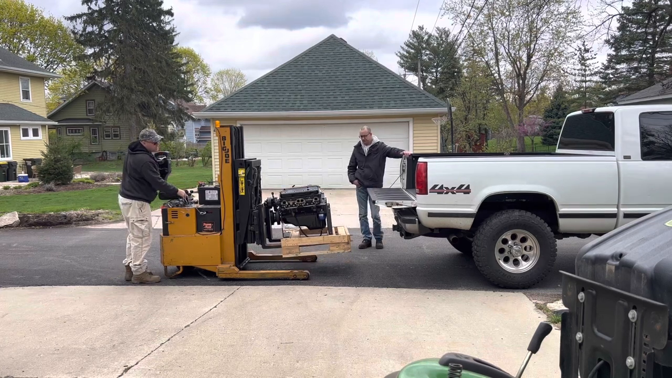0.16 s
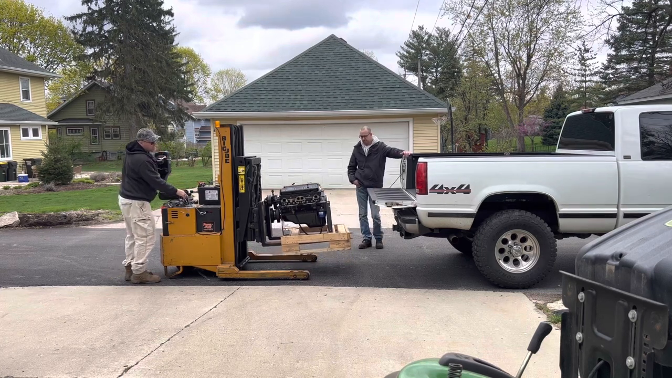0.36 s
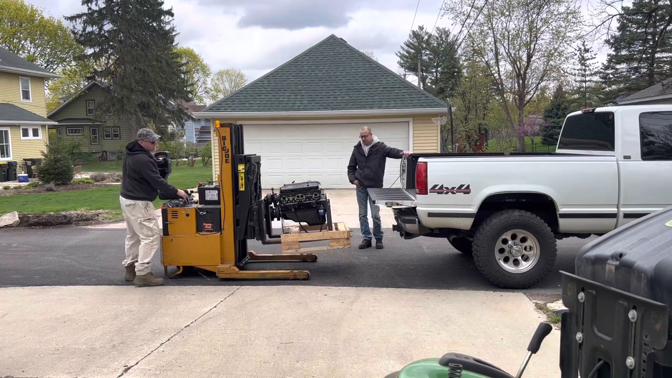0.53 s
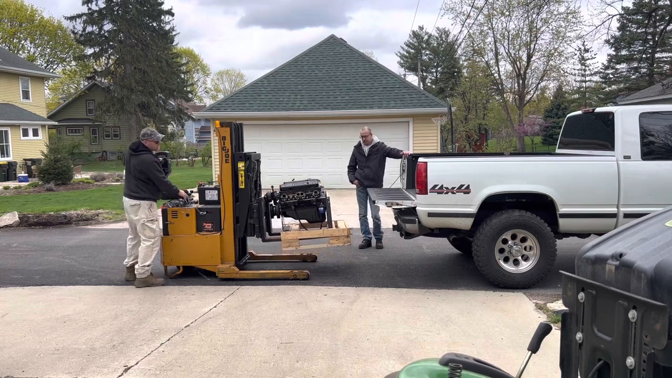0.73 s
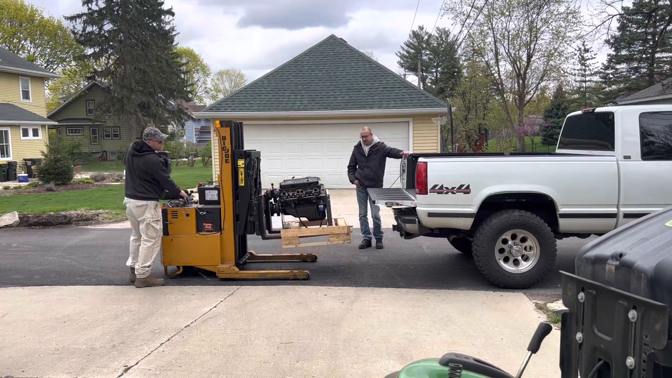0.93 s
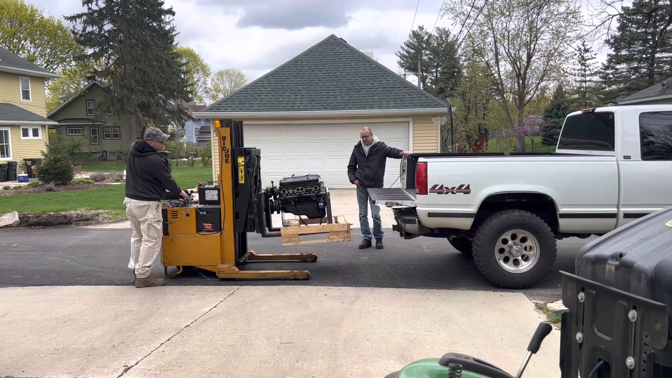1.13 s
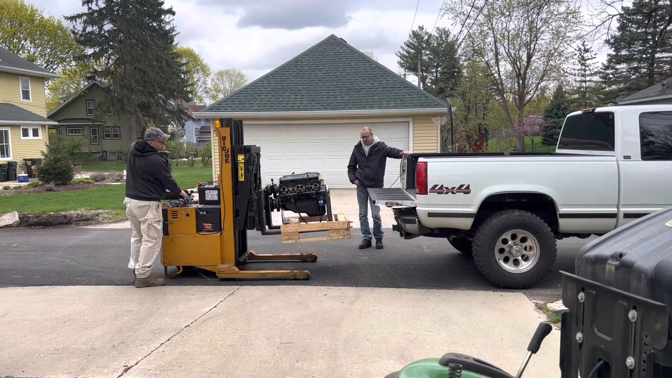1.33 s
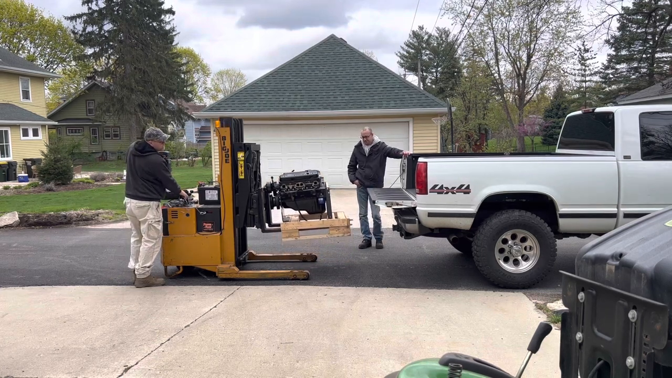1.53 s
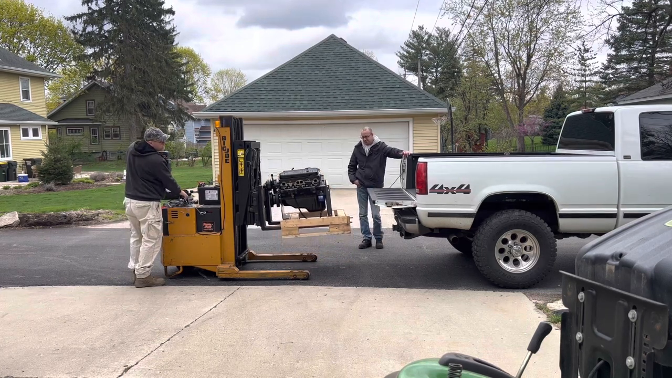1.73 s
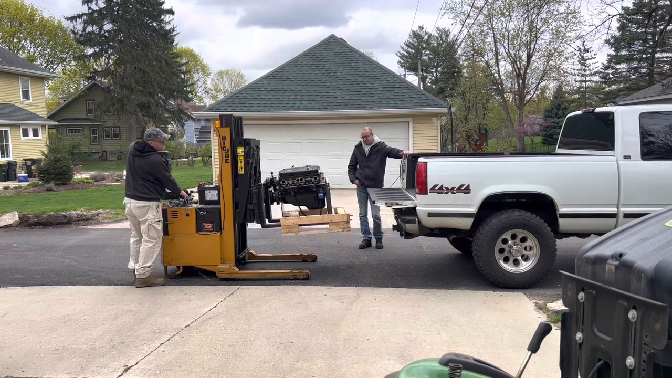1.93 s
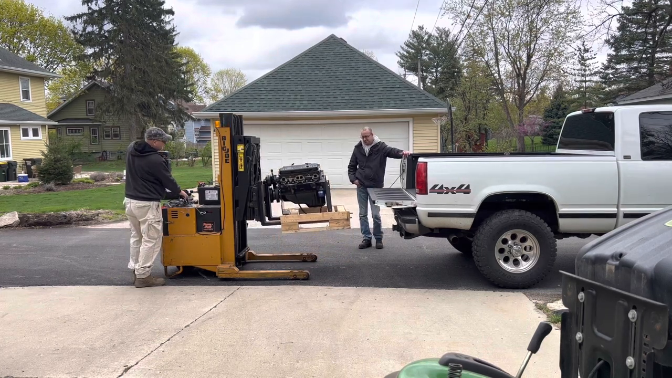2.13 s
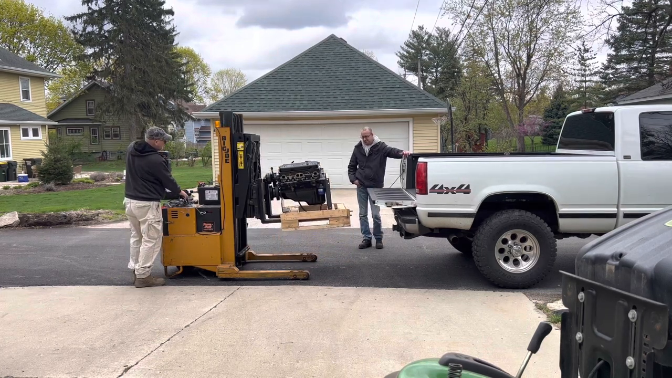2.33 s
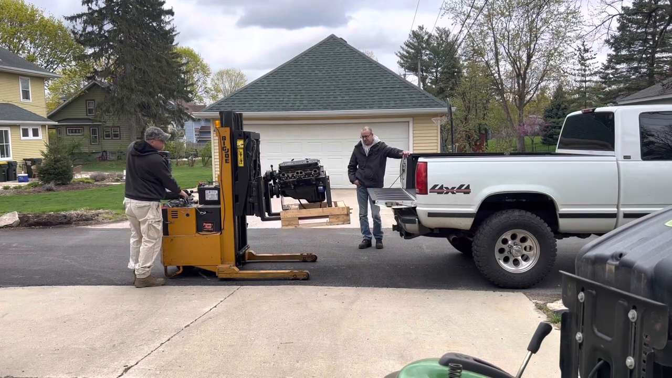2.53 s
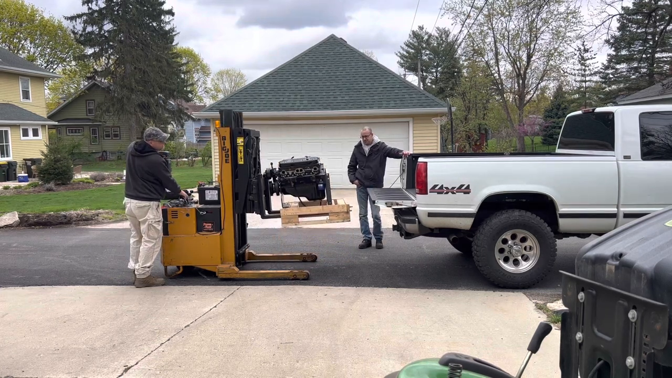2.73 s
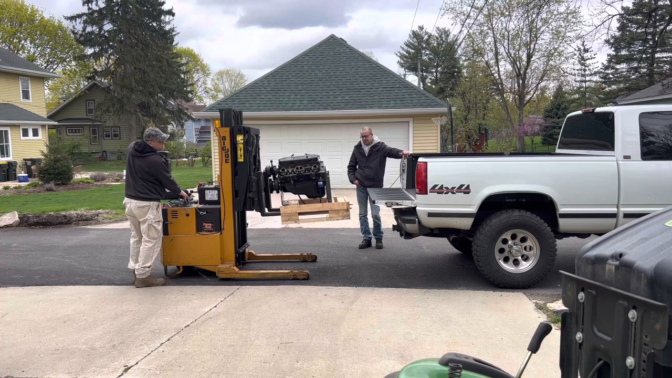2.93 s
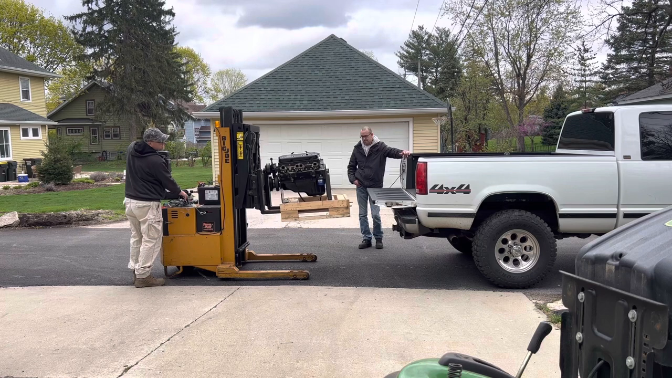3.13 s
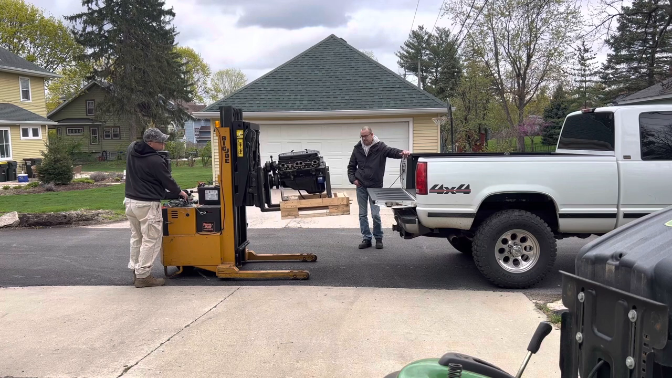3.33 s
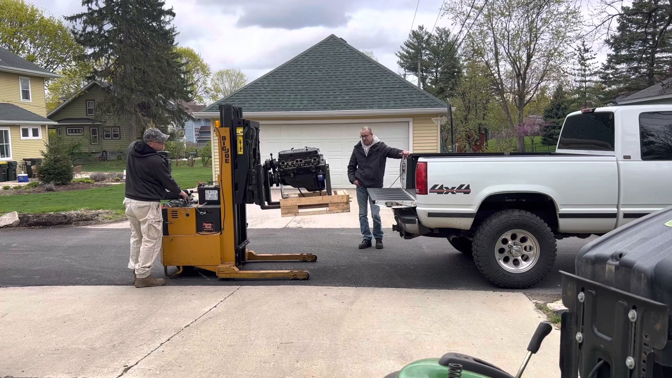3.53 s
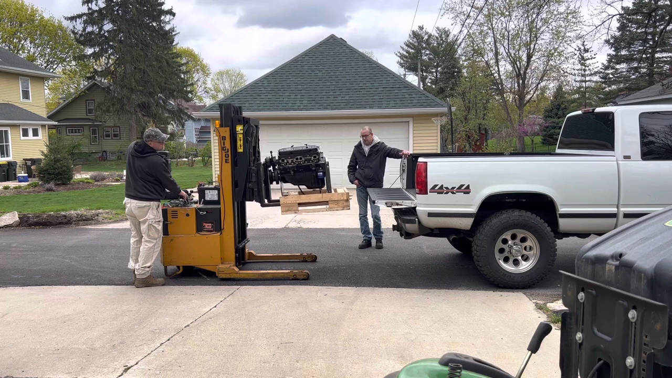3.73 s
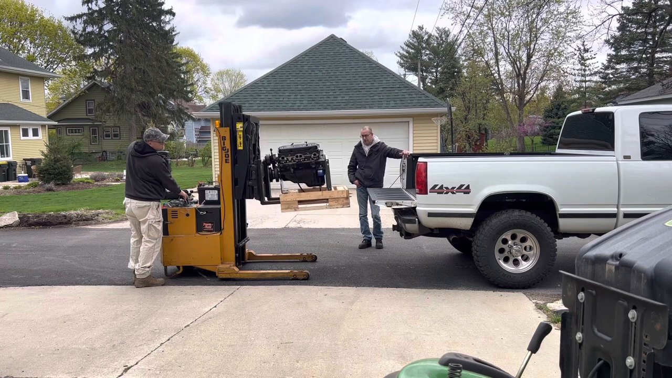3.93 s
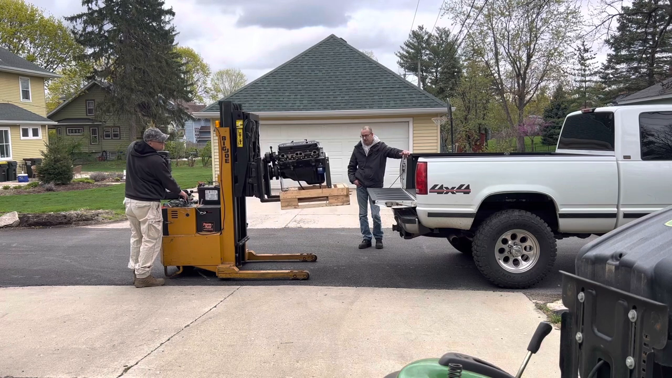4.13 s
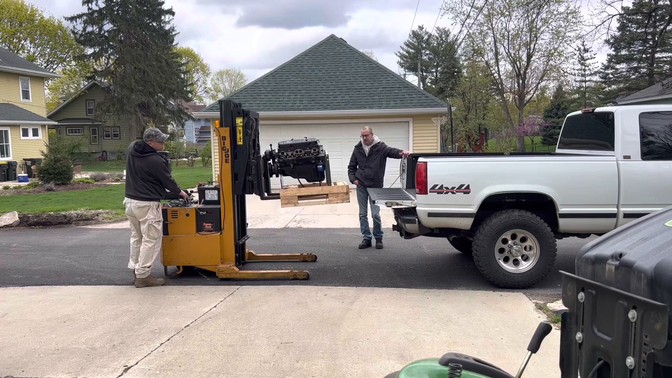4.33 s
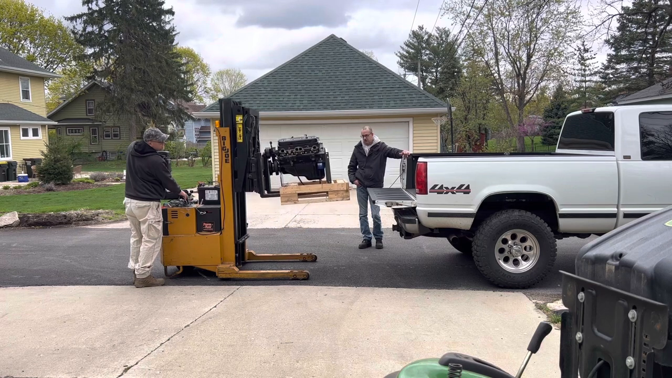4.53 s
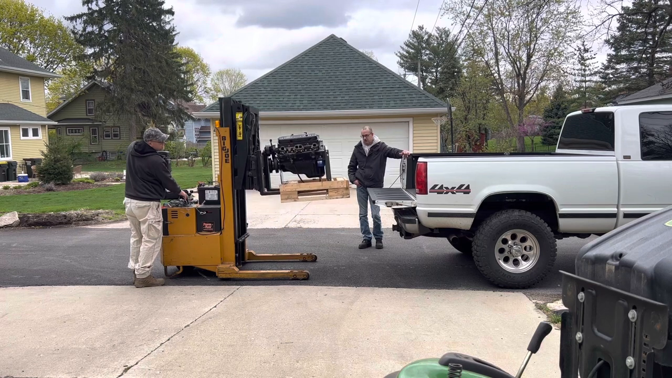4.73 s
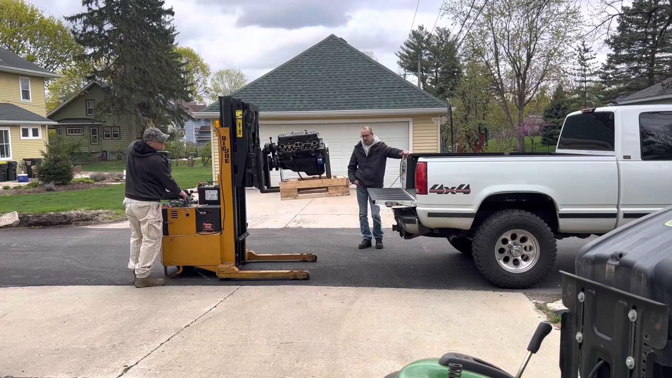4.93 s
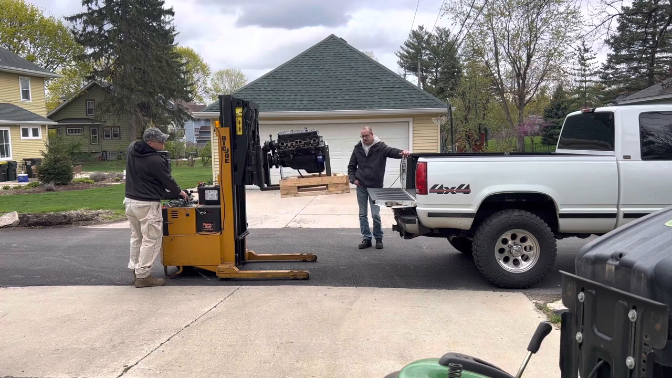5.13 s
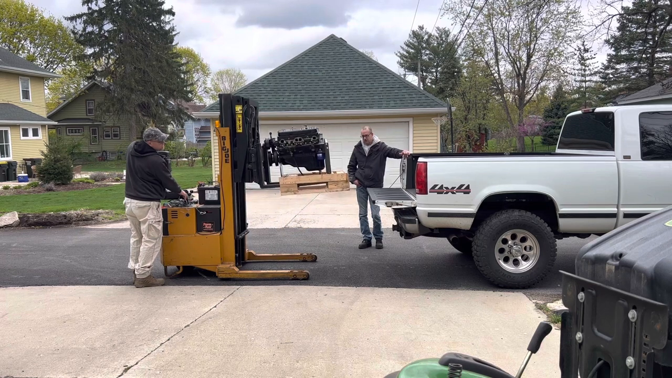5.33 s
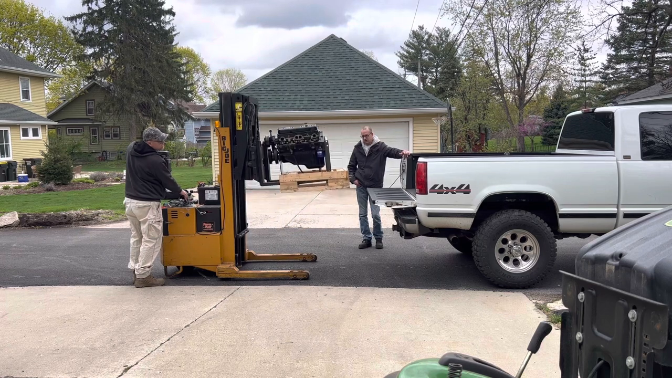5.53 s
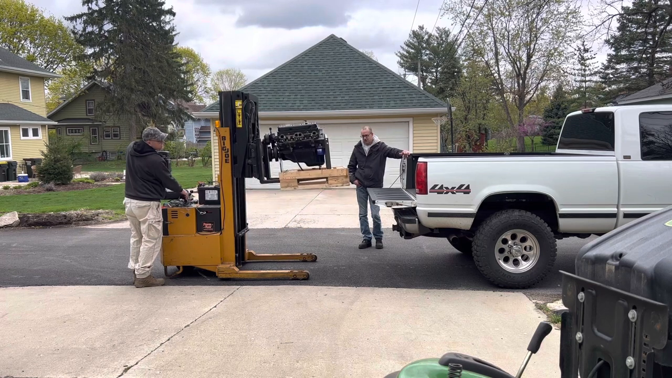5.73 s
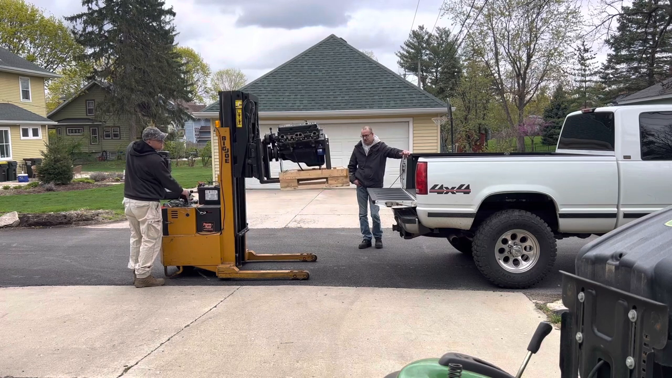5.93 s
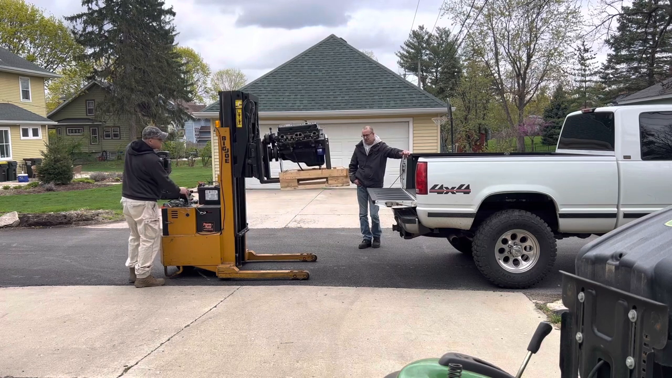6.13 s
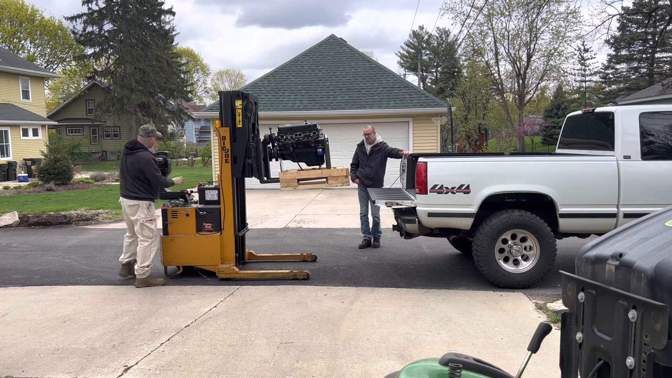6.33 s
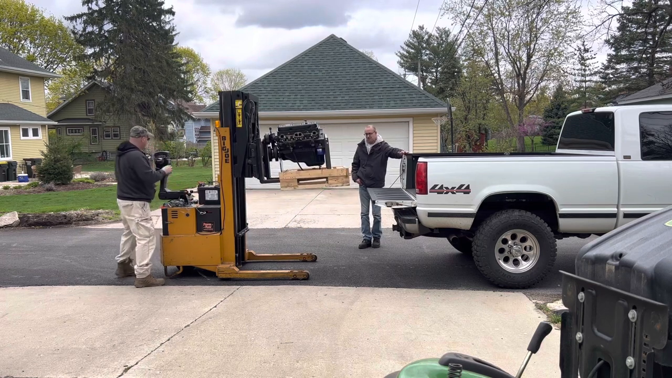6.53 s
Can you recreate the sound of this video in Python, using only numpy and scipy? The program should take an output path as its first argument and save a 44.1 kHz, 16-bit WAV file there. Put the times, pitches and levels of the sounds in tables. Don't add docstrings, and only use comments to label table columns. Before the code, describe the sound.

In a quiet suburban driveway, a phone some metres away picks up an electric stacker already lifting a heavy load. From 0 to about 0.9 s the casing rattles a little more and the whine is slightly louder and higher; it then sags slightly and holds nearly constant. The tone is dense and mechanical, gear and bearing tones between a few hundred hertz and two kilohertz, over rushing oil and bright, grainy brush hiss. Low wind gusts buffet the microphone, strongest around 3 s, with soft thumps near 3.0 and 3.7 s and another gust at 4.2 s. At 5.8 s the pump cuts out abruptly; clustered dull clunks follow until about 6.1 s, with a faint high metallic ring near 5.95 s and a short echo. Shoes scuff grit quietly at 6.25 s and again near 6.5 s, over soft wind and distant engine hum.

```python
import sys
import numpy as np
from scipy import signal
from scipy.fft import rfft, irfft, next_fast_len
from scipy.io import wavfile
from scipy.ndimage import uniform_filter1d

SR = 44100
rng = np.random.default_rng(int(sys.argv[2]) if len(sys.argv) > 2 else 0)


def elevation(decibels):
    levels = np.asarray(decibels, float)
    return 10 ** (levels / 20)


def wav_record(signal):
    frames = np.transpose(np.atleast_2d(signal))
    bounded = np.clip(frames, -1, 1)
    quanta = np.round(bounded * 32767).astype(np.int16)
    wavfile.write(sys.argv[1], SR, quanta)


N = 290178
T = np.arange(N) / SR
OFF_S = 5.812


def level(x, db):
    return x * elevation(db) / np.sqrt(np.mean(x ** 2))


def pan(db):
    return elevation(np.array([db / 2, -db / 2])).reshape(2, -1)


def band(x, hz, width):
    return signal.lfilter(*signal.iirpeak(hz, hz / width, fs=SR), x)


def band_twice(x, hz, width):
    return band(band(x, hz, width), hz, width)


def colour(x, points):
    hz, db = np.transpose(points)
    size = next_fast_len(N)
    f = np.arange(size // 2 + 1) * SR / size + 1
    gain = elevation(np.interp(np.log(f), np.log(hz), db))
    return irfft(rfft(x, size) * gain, size)[..., :N]


def walk(rate):
    hold = int(SR / rate)
    steps = np.repeat(rng.standard_normal(N // hold + 1), hold)
    return 0.96 * uniform_filter1d(uniform_filter1d(steps, hold), hold)[:N]


# [f/Hz, level/dB per Hz]
SUBURB_SPECTRUM = [(88, -33), (150, -7.5), (208, -18), (242, -10), (473, -6), (2530, -22), (2860, -32),
                   (9000, -53), (11700, -104), (19800, -120)]


def suburb():
    noise = rng.standard_normal(N) + 1.5 * rng.standard_normal((2, N))
    return level(colour(noise, SUBURB_SPECTRUM), -57)


# [f/Hz, width/Hz, level/dB]
ENGINE_HUMS = [
    (62.1, 16, -61.5),
    (100, 22, -58),
    (151.8, 6.7, -63),
]


def drone():
    noise = rng.standard_normal(N) + 0.5 * rng.standard_normal((2, N))
    return sum(level(band_twice(noise, hz, width), db) for hz, width, db in ENGINE_HUMS)


# [t/s, level/dB over the breeze, rise/s, fall/s]
GUST_EVENTS = [(0.068, 18, .04, 0.022), (.45, -9, .25, .2), (.77, 9, .04, .05), (1.6, 2, .3, 0.38),
               (2.35, 4.5, .4, 0.08), (3.0, 16.5, 0.14, 0.26), (3.4, 6, .15, .2), (3.78, 14, 0.16, 0.21),
               (4.17, 14, 0.16, 0.24), (4.52, -20, 0.12, 0.096), (4.96, -11, .04, 0.061),
               (5.44, 3, 0.056, .1), (5.85, 10, .1, 0.054), (6.0, 10, .04, 0.055), (6.12, 7, .03, 0.043),
               (6.37, 0.5, 0.086, .03), (6.5, 0, .04, .04)]


def wind():
    eddies = rng.standard_normal(N) + rng.standard_normal((2, N))
    eddy_spectrum = [(22, -34), (40, -5), (62, 2), (100, -0.5), (160, -9.5), (250, -9), (500, -58.0)]
    eddies = colour(eddies * elevation(2 * walk(16)), eddy_spectrum)
    gust_db = sum(db * np.exp(-((T - s) / np.where(T < s, rise, fall)) ** 2)
                  for s, db, rise, fall in GUST_EVENTS)
    veer_db = 1.5 - walk(6)
    return level(eddies, -54) * elevation(gust_db) * pan(veer_db)


# [t/s, peak level/dB, f/Hz, right port share]
PORT_POPS = [
    (2.978, -21, 90, 1),
    (3.04, -30, 120, 1),
    (3.35, -32, 70, -.3),
    (3.715, -27, 110, -.5),
    (3.79, -28, 90, .8),
]


def pops():
    out = np.zeros((2, N))
    for s, db, hz, right in PORT_POPS:
        cycles = np.clip((T - s) * hz, 0, None)
        cycle = np.sin(2 * np.pi * 1.02 * cycles ** 0.92) * np.exp(-(cycles / 0.61) ** 2)
        out += np.array([[1], [right]]) * elevation(db) * cycle
    return out


# [t/s, length/s, level/dB, f/Hz, width/Hz]
SCUFF_EVENTS = [
    (5.947, 0.027, -61.5, 8340, 80),
    (5.97, .06, -82, 5630, 100),
    (5.962, 0.14, -70.5, 3420, 140),
    (6.255, 0.022, -68, 4000, 400),
    (6.258, 0.1, -69, 3480, 4000),
    (6.27, .06, -72, 3330, 140),
    (6.277, 0.036, -76, 6600, 1500),
    (6.36, 0.028, -70, 5770, 1300),
    (6.487, 0.072, -73, 6340, 2000),
    (6.5, 0.055, -64, 2300, 1500),
]


def scuffs():
    noise = rng.standard_normal(N) + rng.standard_normal((2, N))
    out = np.zeros((2, N))
    for s, length, db, hz, width in SCUFF_EVENTS:
        swell = np.clip((T - s) / 0.014, 0, 1) * np.exp(-np.clip(T - s, 0, None) / length)
        out += swell * level(band_twice(noise, hz, width), db)
    return out


# [t/s, peak level/dB, body f/Hz, t60/s, crack level/dB]
KNOCK_EVENTS = [(5.813, -22, 400, 0.16, -3.5), (5.832, -23, 331, 0.2, -21), (5.865, -25, 370, 0.14, -11),
                (5.85, -28.5, 276.5, 0.25, -27), (5.91, -37, 338, 0.57, -17),
                (5.963, -24.5, 301.6, 0.11, -18), (6.051, -37.5, 939, 0.053, 0),
                (6.051, -37, 630, 0.061, -11), (6.111, -41.5, 303, 0.071, -21),
                (6.487, -38, 260, 0.038, -28), (6.514, -33, 108, 0.081, -35)]


def knocks():
    out = np.zeros((2, N))
    age = np.arange(int(0.25 * SR)) / SR
    muffle = signal.butter(3, 2500, fs=SR)
    for s, db, hz, t60, crack_db in KNOCK_EVENTS:
        ring = np.sin(2 * np.pi * hz * age)
        ring += 0.54 * np.sin(2 * np.pi * 1.5 * hz * age)
        ring += 0.19 * np.sin(2 * np.pi * 2.1 * hz * age)
        crack = band_twice(rng.standard_normal((2, len(age))), 1100, 1500)
        envelope = elevation(db - 60 * age / t60) * np.minimum(age * hz / 1.8, 1)
        blow = signal.lfilter(*muffle, envelope * (ring + 4 * elevation(crack_db) * crack))
        at = int(s * SR)
        out[:, at:at + len(age)] += blow[:, :N - at]
    return out


def yard(x, t60=0.52, wet_db=-16):
    age = np.arange(int(0.6 * SR)) / SR
    tail = rng.standard_normal((2, len(age))) * elevation(-60 * age / t60) * (age > 0.012)
    tail = signal.lfilter([0.3], [1, -0.7], tail)
    tail /= np.sqrt(np.sum(tail ** 2, axis=1, keepdims=True))
    return x + elevation(wet_db) * signal.fftconvolve(x, tail, axes=1)[:, :N]


def flow():
    lift_db = -49.5
    slack_end_s, slack_fade_s = 0.86, 0.074
    slack_db = 3.5 * np.clip((slack_end_s - T) / (2 * slack_fade_s) + 0.5, 0, 1)
    kick_db = 2 * np.clip((T - OFF_S) / 0.015 + 1, 0, 1)
    drain_s = np.clip(T - OFF_S - 0.037, 0, None)
    jolt_s = T - 6.056
    jolt = np.clip(jolt_s / 0.011 + 1, 0, 1) * elevation(-54.5 - 110 * np.clip(jolt_s, 0, None))
    casing_gain = elevation(lift_db + slack_db + kick_db - 145 * drain_s) + jolt
    return casing_gain, elevation(lift_db + kick_db - 223 * drain_s)


# [f/Hz, width/Hz, level/dB, left minus right/dB]
CASING_MODES = [(330, 67, -2, 4.5), (400, 62, -10, 11), (547, 106, -2, 6), (645.5, 13.6, -2.5, 4.5),
                (809, 48, -11, -16), (936, 26, 0.5, 1), (1038, 21, -1.5, 10.5), (1154, 40, -1.5, 0.5),
                (1371, 36, -1.5, 1), (1488, 81, -0.5, 9.5), (1717, 120, -2.5, -1), (1870, 200, -6, -7.5),
                (1991.5, 44, -6, 4), (2300, 154, -6.5, 1)]
# [f/Hz, level/dB per Hz]
HISS_SPECTRUM = [(1800, -35), (2600, -34), (3000, 0.5), (3900, -0.5), (4250, -2.5), (4800, 1), (6500, -5),
                 (7800, -5), (9100, -4), (10000, -10), (11100, -3), (13000, -15.5), (15000, -9.5),
                 (17000, -34)]
# [f/Hz, left minus right/dB]
HISS_SIDES = [(2600, -8), (3500, 9.5), (5000, 9), (7000, 10), (9000, -0.5), (15000, 0.5)]
# [f/Hz, width/Hz, level/dB]
HISS_MODES = [(5115, 60, -16), (5400, 120, -19), (5870, 50, -16), (5935, 40, -15), (7610, 90, -15),
              (7855, 80, -16), (8490, 60, -20)]


def rush(shaft, alike=0.76, repeat_db=-5, dull_db=25):
    casing_gain, hiss_gain = flow()
    common = rng.standard_normal(N)
    oil = alike * common + np.sqrt(1 - min(alike, 1) ** 2) * rng.standard_normal((2, N))
    since = np.clip(T - OFF_S - 0.07, 0, None)
    casing = np.zeros((2, N))
    for hz, width, db, side_db in CASING_MODES:
        mode_db = db + 1.9 * walk(9) - dull_db * since * np.log2(hz / 300)
        casing += elevation(mode_db) * pan(side_db) * band_twice(oil, hz, 1.56 * width) / width ** 0.5

    throb_db = 0.33 * np.cos(2 * np.pi * shaft) + 0.3 * np.cos(4 * np.pi * shaft) + walk(7)
    place = (shaft % 1 * 855).astype(int)
    scratches = sum(walk(3.15) * rng.standard_normal(856)[place] for _ in range(4)) / 2
    brushes = common[::-1] + elevation(repeat_db) * scratches + 0.89 * rng.standard_normal((2, N))
    brushes = elevation(throb_db) * brushes
    air = level(colour(brushes, HISS_SPECTRUM), 0)
    for hz, width, db in HISS_MODES:
        air = air + level(band(brushes, hz, width), db) * elevation(2 * walk(8.2))
    hiss = np.array([colour(port, [(hz, side * db / 2) for hz, db in HISS_SIDES])
                     for port, side in zip(air, (1, -1))])
    return level(casing, 13.65) * casing_gain + level(hiss, 3.0) * hiss_gain


# [t/s, shaft turns f/Hz]
SHAFT_SPEED = [(0, 52.8), (.2, 52.28), (.8, 52.0), (1.2, 51.55), (1.5, 51.7), (2.1, 51.665), (2.6, 51.575),
               (3.0, 51.56), (3.3, 51.46), (3.9, 51.47), (5.5, 51.46), (5.8, 51.39)]
# [t/s, ball passes ahead]
CAGE_CREEP = [(0, -.02), (1.1, .17), (2.95, .41), (4.1, .14), (4.25, .2), (4.85, .2), (5.3, .42),
              (5.8, .48)]


def turns():
    balls, outer_per_turn = 8, 3.066
    coast = np.exp(-(np.clip(T - OFF_S, 0, None) / 0.44) ** 2)
    shaft = np.cumsum(np.interp(T, *np.transpose(SHAFT_SPEED)) * coast) / SR
    outer = outer_per_turn * shaft + np.interp(T, *np.transpose(CAGE_CREEP))
    inner = balls * shaft - outer
    return shaft, inner - 0.14, outer + 0.27


INNER_LINES = [(1, 1), (1, 2), (1, 3), (2, -4), (2, -3), (2, -1), (2, 0), (2, 1), (2, 2), (2, 4), (3, -2),
               (3, -1), (3, 1), (3, 2), (4, -2), (4, -1), (4, 0), (5, -2), (5, -1), (5, 1), (5, 2), (6, -3),
               (6, 0), (6, 2), (7, -3), (7, -1), (8, -2), (8, -1)]
OUTER_LINES = [(1, 3), (2, 0), (2, 5), (3, 0), (4, 0), (5, 3), (6, 0), (7, 0), (9, 0)]
GEAR_LINES = [7, 10, 11, 22, 33, 44, 55, 66, 77, 88, 99, 100, 102, 104, 105, 132]
# [light load/dB, rising load/dB, full load/dB, left minus right/dB]
INNER_LEVELS = [(-37.5, -38, -37, -2), (-53, -38, -40, 1), (-55, -56, -53, 4), (-52, -52, -52, -3),
                (-56, -55, -63, 2), (-54, -46, -48, -1), (-49, -48, -48, 0), (-56, -49, -44, 0),
                (-51, -51, -50, 1), (-64, -62, -61, -4), (-52, -48, -48, 3), (-59, -50, -54, -1),
                (-54, -59, -59, -5), (-57, -64, -59, 7), (-58, -50, -49, 9), (-48, -45, -45, -3),
                (-43, -50, -53, 2), (-60, -54, -55, 5), (-61, -61, -59, 8), (-55, -54, -54, 8),
                (-60, -48, -50, 4), (-63, -61, -59, 5), (-56, -56, -57, 12), (-61, -55, -61, 10),
                (-62, -58, -58, 10), (-71, -65, -61, 13), (-69, -65, -64, 9), (-59, -58, -50, -1)]
OUTER_LEVELS = [(-54, -56, -53, 1), (-48, -43, -40, 1), (-54, -59, -63, -7), (-56, -57, -50, -3),
                (-47, -53, -53, 2), (-51, -50, -50, 1), (-37, -39.5, -38, 1), (-52, -55, -57, 6),
                (-56, -55, -52, 6)]
GEAR_LEVELS = [(-59, -54, -52, -1), (-56, -53, -57, 0), (-39, -54, -39.5, -3), (-44, -43, -51, 5),
               (-48, -43, -39, 3), (-65, -59, -62, -1), (-70, -71, -68, 2), (-76, -69, -67, 6),
               (-85, -67, -65, 6), (-82, -70, -66, 9), (-77, -67, -67, 7), (-81, -79, -77, 12),
               (-83, -70, -72, 10), (-83, -74, -77, 14), (-79, -69, -78, 9), (-88, -73, -72, 10)]
# [light until t/s, rising from t/s, rising until t/s, full from t/s]
LOAD_STAGES = (.6, 1.15, 2.6, 3.4)
BOUNCED_LINES = (1018, 1107, 1325, 1628)


def whine(shaft, inner, outer, sway_db=2, fade_s=0.0061):
    angles = [passes * inner + side * shaft for passes, side in INNER_LINES]
    angles += [passes * outer + side * shaft for passes, side in OUTER_LINES]
    angles += [multiple * shaft for multiple in GEAR_LINES]
    levels = list(INNER_LEVELS) + list(OUTER_LEVELS) + list(GEAR_LEVELS)
    end = int((OFF_S + 0.3) * SR)
    out = np.zeros((2, N))
    for angle, (light, rising, full, side_db) in zip(angles, levels):
        weak = np.clip((-45 - full) / 8, 0, 1)
        hz = angle[3 * SR] - angle[2 * SR]
        flip = -1 if min(abs(hz - np.array(BOUNCED_LINES))) < 6 else 1
        db = np.interp(T, LOAD_STAGES, [light + 1.5, rising, rising, full])
        db = db + 1.8 * (hz > 1650) + (0.25 + weak) * sway_db * walk(4)
        phase = angle + (full < -44.5) * rng.random() + 0.05 * weak * walk(7)
        line = 2 ** 0.5 * elevation(db[:end]) * np.cos(2 * np.pi * phase[:end])
        out[:, :end] += pan(side_db) * [[1], [flip]] * line
    return out * np.exp(-np.clip(T - OFF_S - 0.008, 0, None) / fade_s)


def ports(pair, lag_s):
    return np.array([pair[0], np.interp(T - lag_s, T, pair[1])])


def scene():
    shaft, inner, outer = turns()
    stacker = whine(shaft, inner, outer) + yard(rush(shaft) + knocks())
    surroundings = suburb() + drone() + wind() + pops()
    return surroundings + scuffs() + ports(stacker, lag_s=6 / SR)


# [f/Hz, level/dB]
TREBLE_GAPS = [(20, 0), (9640, 0), (9720, -50), (10600, -55), (10750, 0), (13080, 0), (13150, -60),
               (14600, -60), (14650, 0), (15720, 0), (15800, -60)]


def gap_treble(dry):
    return colour(dry, TREBLE_GAPS)


def band_limit(x):
    return signal.sosfilt(signal.butter(12, 17080, fs=SR, output="sos"), x)


def record(dry):
    mix = gap_treble(dry)
    return band_limit(mix)


dry = scene()
out = record(dry)
wav_record(out)
```